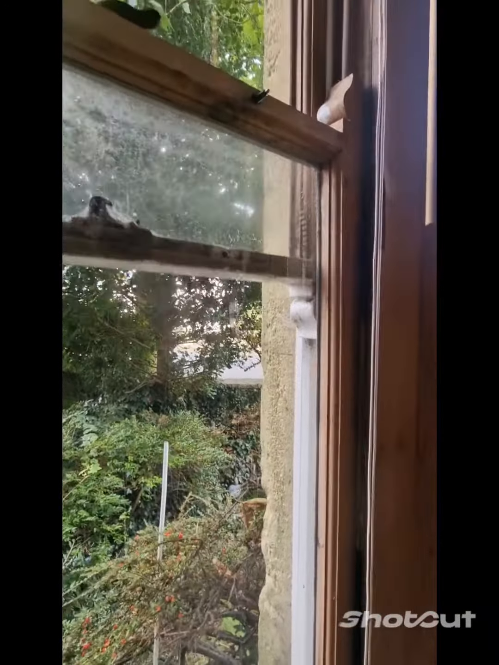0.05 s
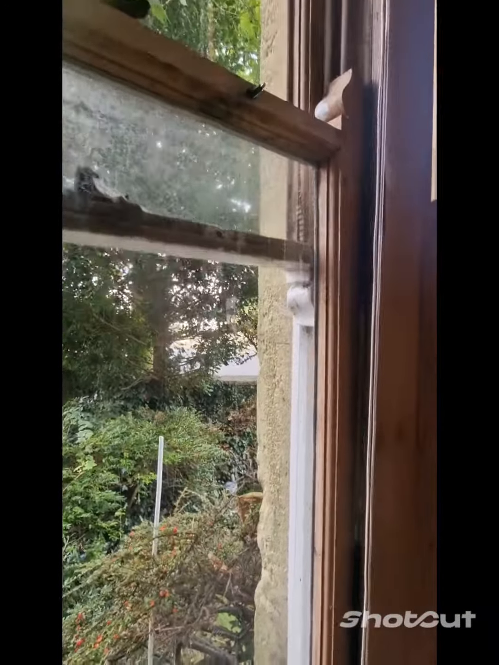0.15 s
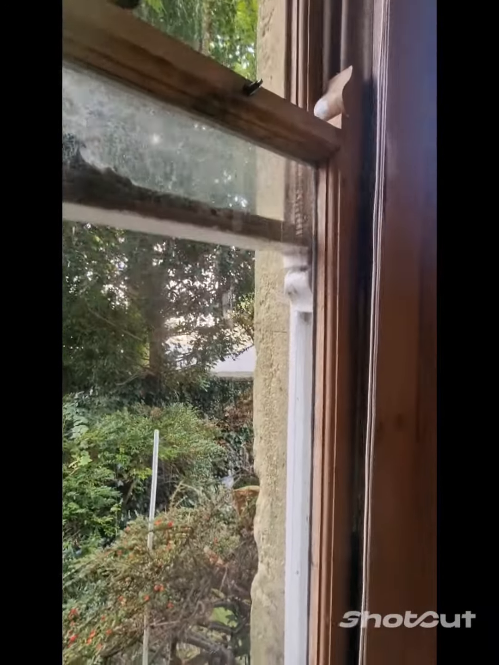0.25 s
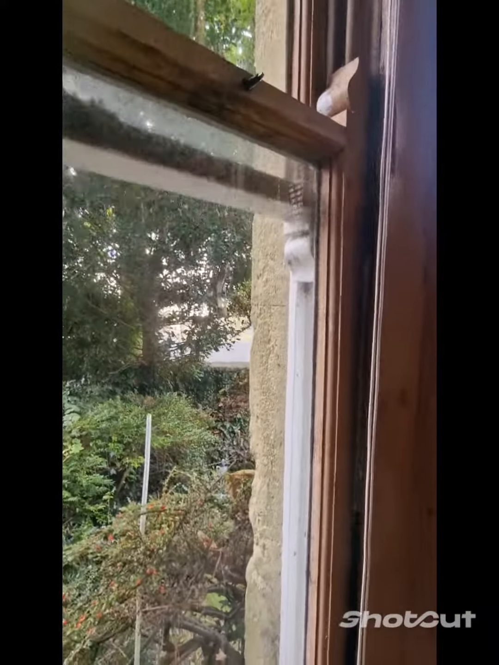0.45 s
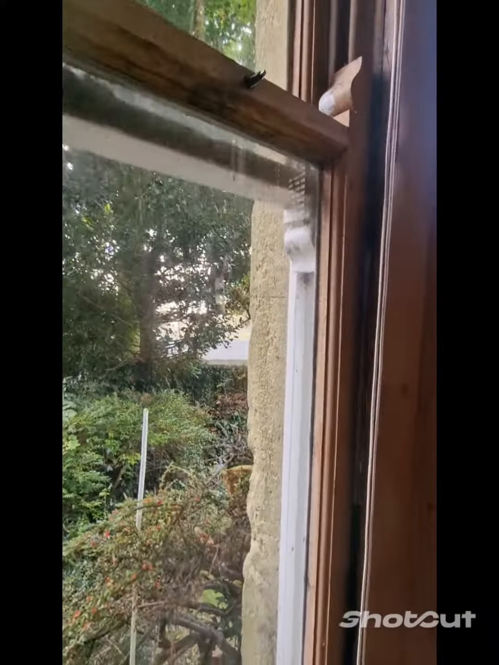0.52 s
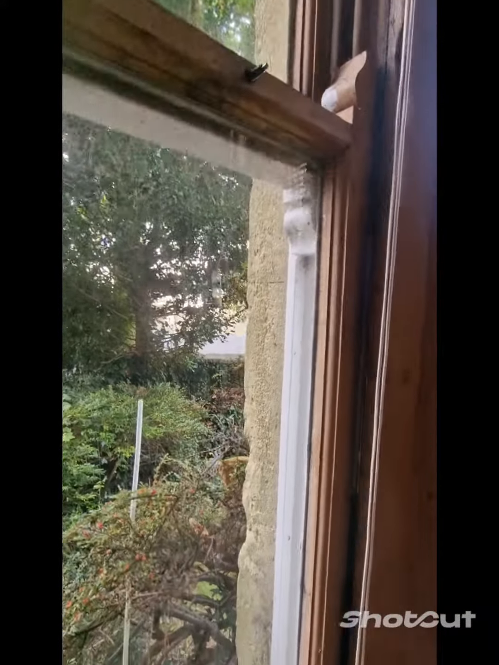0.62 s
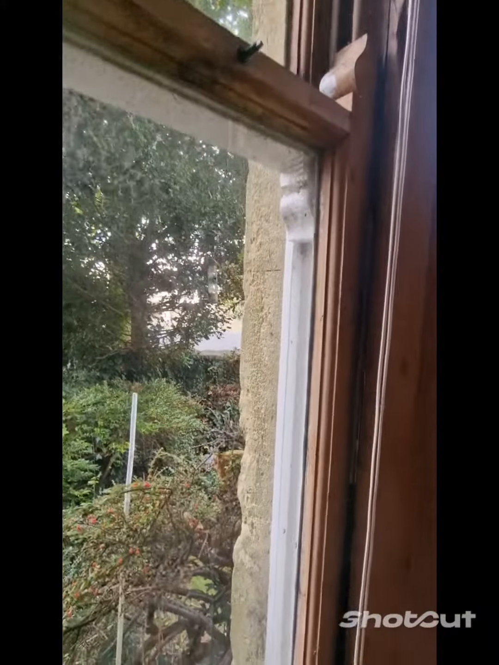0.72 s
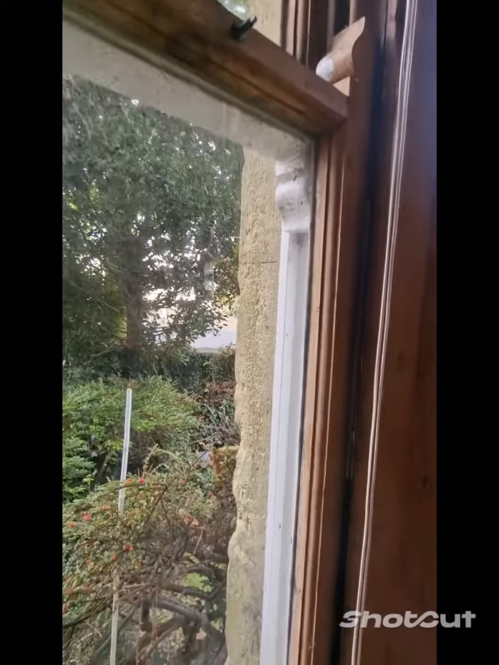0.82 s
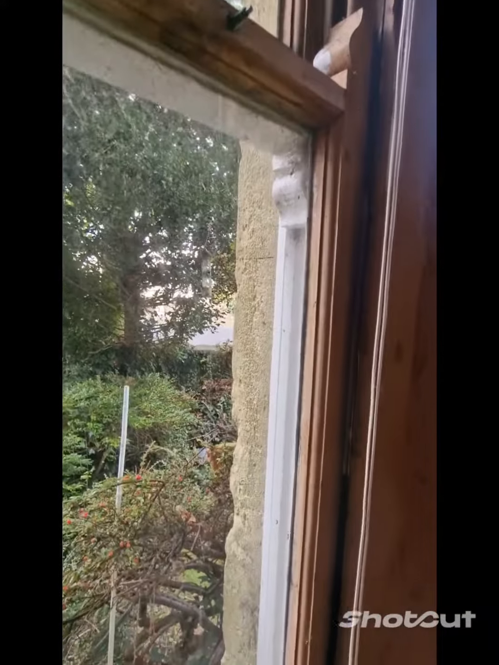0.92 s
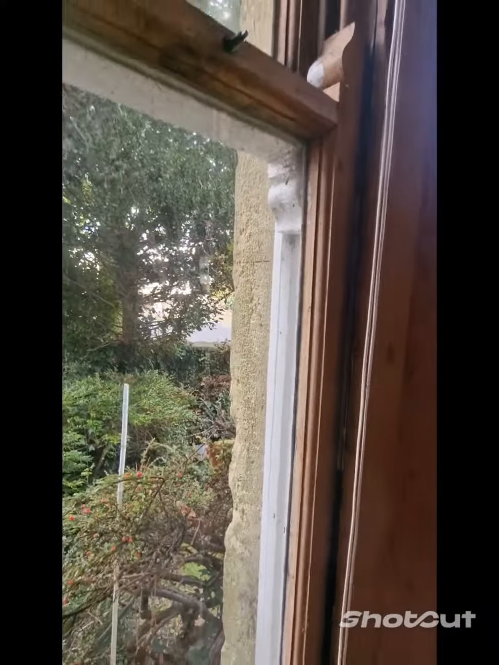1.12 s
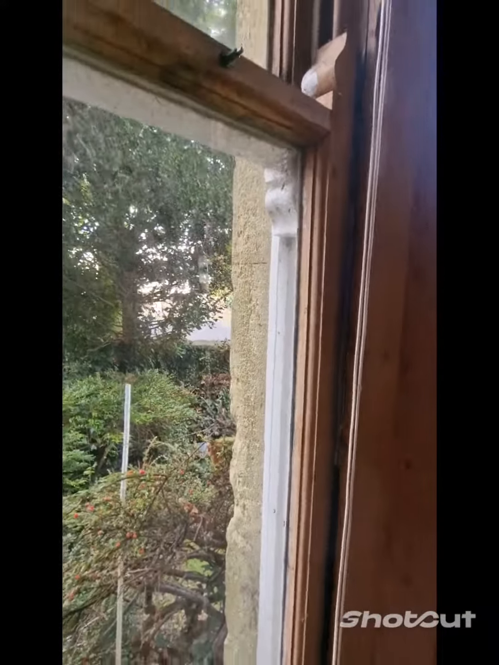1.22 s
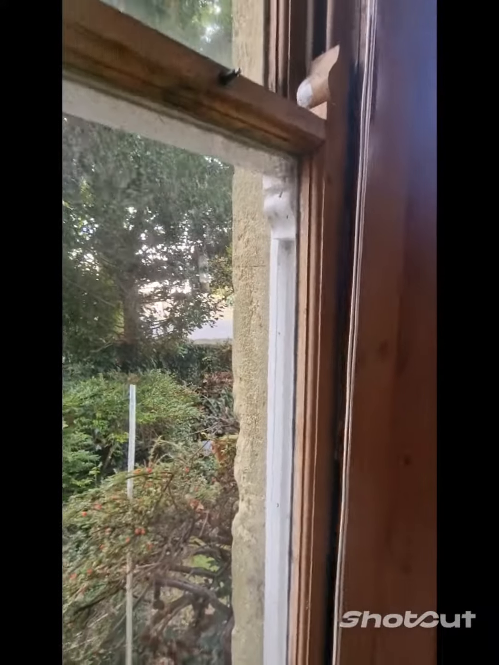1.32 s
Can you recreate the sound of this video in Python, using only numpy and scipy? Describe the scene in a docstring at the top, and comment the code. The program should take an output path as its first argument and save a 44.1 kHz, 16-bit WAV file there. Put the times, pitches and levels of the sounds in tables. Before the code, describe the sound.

Close up indoors, a wooden window sash rasps and judders upward, knocks hard twice at the top with a short woody ring, then faint finger brushes and near silence with low room rumble.

```python
"""A wooden sash slides up its frame in a quiet room, its pane humming low, in stereo.
One low sine, wavering in pitch and level, makes the hum; random grains and single jolts in the grooves
drive the wood's resonances. At the stop come a tick, a knock and a louder knock: noise cracks over low
damped thuds, with a ring-on. Fingers brush off in puffs of noise, then a thin airy whistle follows from
narrow resonant noise.
"""
import sys
import numpy as np
from scipy import signal
from scipy.fft import rfft, irfft
from scipy.io import wavfile

SR = 44100
rng = np.random.default_rng(int(sys.argv[2]) if len(sys.argv) > 2 else 0)


def put_to_file(sound):
    """Save the sound as 16-bit audio at rate SR, in the file named by the first command-line argument."""
    columns = np.atleast_2d(sound).T  # one column per channel
    safe = np.clip(columns, -1, 1)
    whole_steps = np.round(safe * 32767)
    wavfile.write(sys.argv[1], SR, whole_steps.astype(np.int16))


N = 59535  # length in samples
T = np.arange(N) / SR  # time in seconds

# Low resonances of the sash. Each row: pitch in Hz, relative level in dB, 60 dB decay in seconds.
RUMBLE_MODES = [(106.4, 1, 0.13), (155, -3.5, 0.14), (200, -4.5, 0.15), (267, -1, 0.073), (326, 0, 0.063)]
# Hollow resonances of the sash. Each row: pitch in Hz, relative level in dB, 60 dB decay in seconds.
HOLLOW_MODES = [(410, -9, .07), (460, 0, .075), (492, -2, .07), (590, -14, .05), (672, -7, .08),
                (880, -18, .07)]
# Resonances that stand out of the rasp. Each row: pitch in Hz, relative level in dB, 60 dB decay in seconds.
RASP_MODES = [(810, 0, 0.03), (1218, -10, 0.17), (1462, 2, 0.064), (1618, 4.5, 0.031), (2030, -13, 0.14),
              (2842, -17.5, 0.12), (3840, -10.5, 0.015), (4170, -26, 0.05)]
# Cracks at the stop. Each row: start in seconds, level in dB, tilt in dB per octave,
# 60 dB decay in seconds, level of the highest treble in dB.
CRACKS = [(0.68, -47.5, 0.5, 0.033, -91), (0.6983, -34, 3.5, 0.021, -63), (0.7168, -52.5, 8.5, 0.043, -86),
          (0.7393, -16, -5, 0.0078, -68), (0.742, -20.5, -9.5, 0.036, -81.5), (0.7448, -29, 3, 0.028, -67)]
CRACK_RISE_S = .0005
# Above this pitch the microphone path is weaker by this many dB.
STEP_HZ, STEP_DB = 7900, -55.5


def amp(db):
    """Amplitude factor of a level in dB."""
    return 10 ** (np.asarray(db) / 20)


def unit(x):
    """Scales a signal to an RMS of 1."""
    return x / np.sqrt(np.mean(x ** 2) + 1e-20)


def in_time(rows):
    """Draws each column of a table as a line over time; the first column is seconds."""
    seconds, *columns = np.transpose(rows)
    return [np.interp(T, seconds, column) for column in columns]


def at_hz(points, hz):
    """Reads a curve given by (Hz, value) points, straight over log frequency."""
    points = np.array(points)
    return np.interp(np.log(hz), np.log(points[:, 0]), points[:, 1])


def colour(x, points):
    """Shapes a sound by a dB spectrum that drops by 40 dB outside its ends."""
    hz = np.maximum(np.fft.rfftfreq(N, 1 / SR), 1)
    below = (points[0][0] / 2, points[0][1] - 40)
    above = (points[-1][0] * 1.1, points[-1][1] - 40)
    return irfft(rfft(x) * amp(at_hz([below] + list(points) + [above], hz)), N)


def ring(clicks, hz, t60):
    """Damped two-pole resonance: a unit click sets a sine of starting height 1 ringing."""
    radius = amp(-60 / (t60 * SR))
    angle = 2 * np.pi * hz / SR
    poles = [1, -2 * radius * np.cos(angle), radius * radius]
    return signal.lfilter([0, np.sin(angle)], poles, clicks + 1e-18)


def body(clicks, modes):
    """Wooden body: all resonances in parallel, with alternating signs."""
    return sum((-1) ** k * amp(db) * ring(clicks, hz, t60) for k, (hz, db, t60) in enumerate(modes))


def dying(start, rise, t60):
    """Envelope of a blow: smooth rise, exponential fall."""
    t = np.maximum(T - start, 0)
    return (1 - np.exp(-t / rise)) * amp(-60 * t / t60)


def bump(start, end, fade):
    """Envelope that fades in ahead of start, holds to end and fades out after it."""
    return np.sin(np.pi / 2 * np.clip(np.minimum(T - start, end - T) / fade + 1, 0, 1)) ** 2


def flicker(rate_hz):
    """Random drift of spread 1: noise kept below the given rate."""
    lowpass = signal.butter(2, rate_hz, fs=SR, output="sos")
    slow = signal.sosfilt(lowpass, rng.standard_normal(N + SR // 4))
    return unit(slow[-N:])  # leaves out the filter's start


def narrow(hz, width_hz):
    """Airy band: noise sent twice through one resonance."""
    t60 = np.log(1000) / (np.pi * width_hz)
    return unit(ring(ring(rng.standard_normal(N), hz, t60), hz, t60))


def room_tone():
    """Low room rumble shared by both sides, with separate faint hiss on each."""
    # Rumble spectrum. Each row: frequency in Hz, relative level in dB.
    rumble_shape = [(12, -14), (20, 5), (81, -9), (231, -30.5), (282, -18.5), (370, -20.5), (433, -31),
                    (600, -33.5), (780, -55.5)]
    # Hiss spectrum. Each row: frequency in Hz, relative level in dB.
    hiss_shape = [(500, 0), (900, -7), (1500, -7), (3000, -7), (4300, -16), (6500, -14), (7100, -20),
                  (7600, -36)]
    # the rumble is half a dB stronger for about the first second
    level_db = -47 + 0.5 * bump(-1, 0.98, 0.059)
    lows = amp(level_db) * unit(colour(rng.standard_normal(N), rumble_shape))
    hiss = [amp(-70) * unit(colour(rng.standard_normal(N), hiss_shape)) for _ in "LR"]
    return lows * amp([[-.5], [.5]]) + np.array(hiss)


def air():
    """Faint highest treble: partly shared noise that flares with each crack."""
    steady_db, t60_s = -89, 0.07
    # Each row: frequency in Hz, relative level in dB.
    shape = [(9000, -45), (11200, -8), (12500, -4), (14000, -9), (15500, -9)]
    flares = sum(amp(treble_db) * dying(s, CRACK_RISE_S, t60_s) for s, *_, treble_db in CRACKS)
    env = amp(steady_db) + flares
    noise = rng.standard_normal((2, N))
    treble = unit(colour(0.35 * noise[0] + noise, shape))
    return env * amp([[-5], [3]]) * treble  # leans right


def whistle():
    """Thin noisy bands, one leaning to each side, inside a fainter broad one; all waver in level."""
    # Each row: centre in Hz, width in Hz, left level in dB, right level in dB.
    bands = [(5480, 260, -66, -90), (6700, 520, -80, -62), (6000, 2200, -74, -74)]
    out = 0
    for hz, width_hz, left_db, right_db in bands:
        level_db = 2.2 * flicker(14) + [[left_db], [right_db]]
        out = out + narrow(hz, width_hz) * amp(level_db)
    return bump(1.02, 1.07, .11) * out


def brushes():
    """Fingers brush off the wood: short puffs of friction noise, mostly on the left."""
    # Each row: peak time in seconds, level in dB before panning, fade on each side in seconds,
    # centre in Hz, width in Hz.
    strokes = [(.93, -69, .02, 1000, 500), (.963, -66, .022, 3300, 1000), (.998, -60, .028, 3100, 1000)]
    puffs = sum(amp(db) * bump(s, s, fade) * narrow(hz, width_hz) for s, db, fade, hz, width_hz in strokes)
    return puffs * amp([[4], [-9]])


def hum():
    """Pane and frame hum: one low sine wavering in pitch and level."""
    # Each row: time in seconds, pitch in Hz, RMS level in dB.
    course = [(0.0, 64.5, -45.5), (0.086, 64.96, -33), (0.174, 64.5, -50), (0.19, 66.5, -36),
              (0.227, 72.6, -38.5), (0.296, 72.9, -31.5), (0.316, 74.65, -50), (0.398, 75.1, -32),
              (0.432, 77, -41), (0.448, 72.4, -46), (0.491, 66.3, -28), (0.521, 68.6, -31.5),
              (0.538, 73, -55), (0.551, 76, -26), (0.566, 73.5, -24), (0.602, 64.5, -28.5),
              (0.644, 68.2, -29), (0.684, 70.8, -28), (0.698, 70.6, -38.5), (0.74, 70.2, -44),
              (0.788, 76, -35), (0.836, 67.2, -49), (0.939, 72.7, -52), (0.95, 72.7, -56.5)]
    hz, db = in_time(course)
    tone = np.sqrt(2) * np.sin(2 * np.pi * np.cumsum(hz) / SR)
    return amp(db) * tone * bump(-1, course[-1][0], .05)


def grains():
    """Rough wood: about 2500 random clicks per second, of uneven size and sign."""
    sizes = amp(3.5 * np.minimum(rng.exponential(1, N), 5))
    signs = rng.choice([-1, 1], N)
    return sizes * signs * (rng.random(N) < 2500 / SR)


def scrape():
    """Stiles scrape in the grooves: grains drive the sash's resonances under a broad, flickering rasp."""
    # Each row: time in seconds, then rumble, hollow ring and rasp in dB, before the trims below.
    course = [(0.0, -51.5, -35.5, -47.5), (0.036, -31.5, -32, -43.5), (0.082, -49.5, -50.5, -47),
              (0.11, -33, -34, -44.5), (0.166, -40.5, -56.5, -46.5), (0.206, -40.5, -66.5, -45),
              (0.24, -34, -18, -42), (0.272, -32, -30.5, -42.5), (0.314, -38.5, -28.5, -42),
              (0.372, -33.5, -27, -43), (0.4, -52.5, -34, -44.5), (0.426, -19, -29, -41.5),
              (0.458, -38.5, -52, -43), (0.478, -45, -34, -41.5), (0.538, -39, -40.5, -47.5),
              (0.598, -30.5, -40, -45.5), (0.632, -42, -48.5, -51.5), (0.68, -33, -46.5, -41)]
    # Rasp spectrum. Each row: frequency in Hz, relative level in dB.
    rasp_shape = [(410, 2), (700, -10), (807, -17), (1010, -10), (1360, -16), (1630, -21), (2140, -21),
                  (3210, -31.5), (3670, -30), (6900, -33.5), (7900, -46.5), (10300, -68), (17500, -120)]
    rumble_db, hollow_db, rasp_db = in_time(course)
    noise = rng.standard_normal(N) + .5 * unit(grains())
    flickering = noise * amp(3.5 * flicker(40))
    rasp = unit(colour(noise, rasp_shape)) + amp(-7.5) * unit(body(flickering, RASP_MODES))
    rumble = unit(body(grains(), RUMBLE_MODES))
    hollow = unit(body(grains(), HOLLOW_MODES))
    out = amp(rumble_db - 3.5) * rumble + amp(hollow_db - 7.5) * hollow + amp(rasp_db) * rasp
    return out * bump(-1, .70, 0.09)


def bumps():
    """Bumps in the grooves: single jolts into the sash's resonances, each with a tick of noise."""
    # Each row: time in seconds, then jolt into rumble, hollow and ring, and tick, in dB before the mix.
    jolts = [(.035, -34.5, -56, -40.5, -67), (.107, -23, -31.5, -52.5, -58),
             (0.225, -34.5, -28, -47.5, -46.5), (.2315, -43, -18, -56, -67),
             (0.241, -30.5, -15.5, -29.5, -60.5), (0.268, -40, -29, -59, -53.5),
             (.283, -47, -30, -48, -59.5), (.312, -36.5, -44.5, -34.5, -72), (.345, -43.5, -30.5, -40, -55),
             (0.36, -40, -19, -38.5, -58.5), (0.419, -34.5, -24, -57.5, -66.5),
             (.459, -26, -41.5, -35.5, -70.5), (0.479, -33.5, -33, -48, -74.5),
             (0.593, -52.5, -56, -44, -58.5), (0.676, -27.5, -33, -62, -58.5),
             (0.6971, -30, -38.5, -34, -52)]
    # Tick spectrum. Each row: frequency in Hz, relative level in dB.
    tick_shape = [(2000, -12), (3000, -7), (3600, 0), (4250, -1), (4600, -18), (8000, -28)]
    low, mid, high, tick = np.zeros((4, N))
    for s, *levels in jolts:
        for train, level_db in zip((low, mid, high, tick), levels):
            train[int(s * SR)] = amp(level_db)
    tick_decay = amp(-60 * T[:1500] / 0.064)
    tick_env = np.convolve(tick, tick_decay)[:N]
    ticks = tick_env * unit(colour(rng.standard_normal(N), tick_shape))
    ring_hz, _, ring_t60 = RASP_MODES[3]
    wood = 0.49 * (body(low, RUMBLE_MODES) + body(mid, HOLLOW_MODES))
    return wood + ring(high, ring_hz, ring_t60) + ticks


def tail():
    """Ring-on of frame and room: half-octave noise bands, each dying unevenly at its own rate."""
    # Spectrum. Each row: frequency in Hz, relative level in dB.
    shape = [(35, -39), (60, -26.5), (185, -15.5), (363, -19), (483, -22.5), (910, -37), (1120, -48),
             (1310, -38.5), (3040, -48), (7940, -62.5), (10300, -84.5), (17500, -120)]
    # Each row: frequency in Hz, 60 dB decay in seconds.
    decays = [(60, 0.82), (150, 0.47), (400, 0.21), (700, 0.25), (1500, 0.26), (3000, 0.26), (8000, 0.25)]
    # Blows that set it off. Each row: start in seconds, level in dB.
    starts = [(0.684, -27), (0.702, -24), (0.755, -19)]
    noise = unit(colour(rng.standard_normal(N), shape))
    out = 0
    edges = 50 * 2 ** np.arange(0, 7.6, .5)
    for low, high in zip(edges, edges[1:]):
        t60 = at_hz(decays, np.sqrt(low * high))
        env = sum(amp(db) * dying(s, 0.00067, t60) for s, db in starts)
        env = env * amp(flicker(30))  # wavers with a spread of 1 dB
        band = signal.butter(2, [low, high], "band", fs=SR, output="sos")
        out = out + env * signal.sosfilt(band, noise)
    return out


def thuds():
    """Low sine swings of the whole sash, each starting with a pull, held briefly and then damped."""
    # Each row: start in seconds, pitch in Hz, peak level in dB, hold in seconds, 60 dB decay in seconds.
    swings = [(0.309, 153.3, -30.5, 0.034, 0.061), (0.6898, 76, -19.5, 0.016, 0.04),
              (0.7058, 76, -19, 0.019, 0.02), (0.7187, 125, -17, .01, 0.027),
              (0.7365, 107.5, -21, 0.014, 0.013), (0.7446, 216, -7, 0.0093, 0.0038),
              (0.423, 95, -31.5, .016, .04), (.760, 130.7, -25.5, 0.0035, 0.037),
              (0.7772, 131.8, -20.5, 0.015, 0.037), (1.055, 55.8, -39.5, 0.016, 0.054)]
    out = 0
    for s, hz, db, held, t60 in swings:
        t = np.maximum(T - s, 0)
        env = (1 - np.exp(-t / .0007)) * amp(-60 * np.maximum(t - held, 0) / t60)
        out = out - amp(db) * env * np.sin(2 * np.pi * hz * t)  # minus: the pull comes first
    return out


def cracks():
    """Bright cracks at the stop: tilted noise with a sharp rise and quick decay."""
    # Spectrum before each crack's tilt. Each row: frequency in Hz, relative level in dB.
    crack_shape = [(500, -6.5), (1000, -11.5), (1500, -2), (2300, -0.5), (3300, -3.5), (4200, -13),
                   (6000, -7), (7200, -18), (7900, -20.5)]
    out = 0
    for s, db, tilt_db, t60, _ in CRACKS:
        shape = [(hz, level + tilt_db * np.log2(hz / 2000)) for hz, level in crack_shape]
        noise = unit(colour(rng.standard_normal(N), shape))
        out = out + amp(db) * noise * dying(s, CRACK_RISE_S, t60)
    return out


def noisy_sash():
    """The sash's noise, drawn afresh at each call: scrape, cracks and ring-on."""
    return scrape() + cracks() + tail()


def ports(same, other):
    """Two microphone ports: balance, phase lead and likeness by frequency."""
    # Each row: frequency in Hz, left minus right in dB.
    balance = [(40, -4.5), (90, 0.4), (180, -5), (350, 6), (700, 3), (1400, 0.5), (2800, 15), (5000, 10.5),
               (7500, -7.5)]
    # Each row: frequency in Hz, lead of the left in radians.
    lead = [(40, .15), (90, 0.17), (180, 0.4), (350, 0.71), (700, 1.72), (1400, 1.39), (2800, 1),
            (7500, 1.5)]
    # Each row: frequency in Hz, left-right likeness from 0 to 1.
    likeness = [(40, .99), (180, .98), (350, .9), (700, .65), (1400, .45), (2800, .55), (7500, .45)]
    hz = np.maximum(np.fft.rfftfreq(2 * N, 1 / SR), 1)
    alike = np.clip(at_hz(likeness, hz), 0, 1)
    side = np.array([[1], [-1]])
    gain = amp(side * at_hz(balance, hz) / 2) * np.exp(.5j * side * at_hz(lead, hz))
    shared = np.sqrt((1 + alike) / 2) * rfft(same, 2 * N)
    opposed = side * np.sqrt((1 - alike) / 2) * rfft(other, 2 * N)
    return irfft(gain * (shared + opposed), 2 * N)[:, :N]


def scene():
    """The sash at the two ports, with room, brushing fingers, whistle and highest treble."""
    sash = ports(hum() + thuds() + bumps() + noisy_sash(), noisy_sash())
    # air is raised here so that its levels hold after the step in record()
    return sash + room_tone() + brushes() + whistle() + air() / amp(STEP_DB)


def record(dry):
    """Microphone path: far weaker treble above the step, and the top cut away."""
    hz = np.fft.rfftfreq(2 * N, 1 / SR)
    faded = dry * bump(-1, T[-1] - .004, .004)  # short fade at the very end
    step = np.where(hz > STEP_HZ, amp(STEP_DB), 1)
    stepped = irfft(rfft(faded, 2 * N) * step)[:, :N]
    top_cut = signal.cheby2(12, 70, 15600, fs=SR, output="sos")  # 70 dB down from 15600 Hz up
    return signal.sosfilt(top_cut, stepped)


dry = scene()
out = record(dry)
put_to_file(out)
```